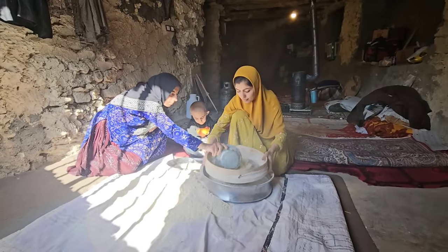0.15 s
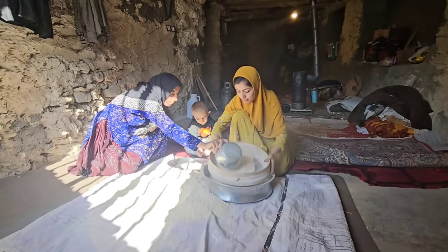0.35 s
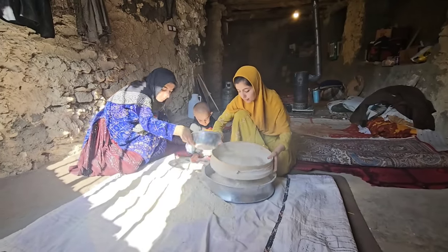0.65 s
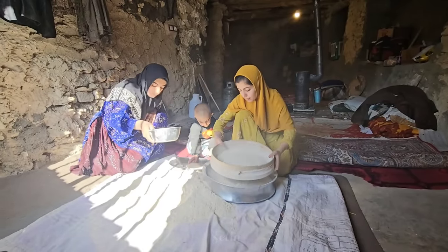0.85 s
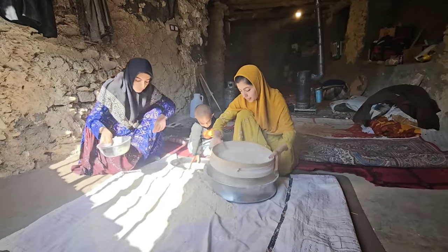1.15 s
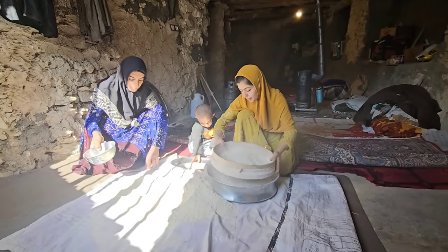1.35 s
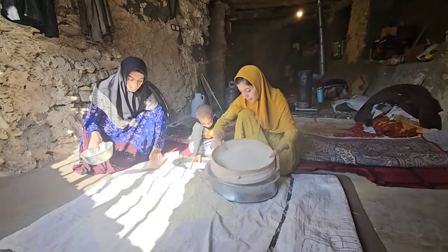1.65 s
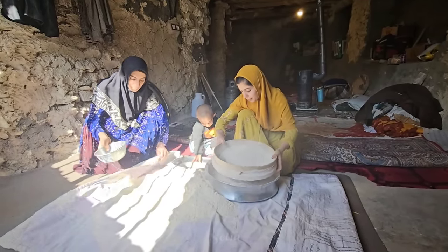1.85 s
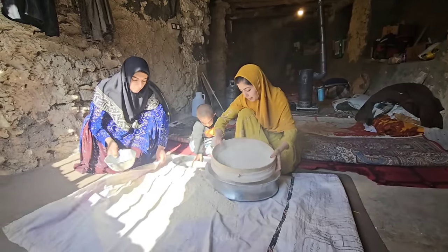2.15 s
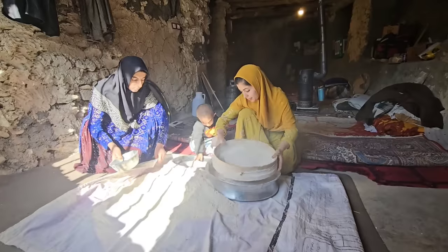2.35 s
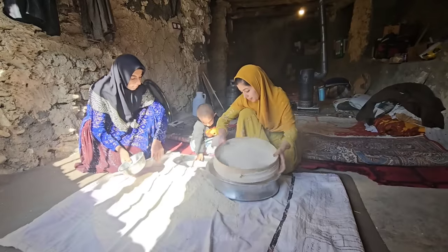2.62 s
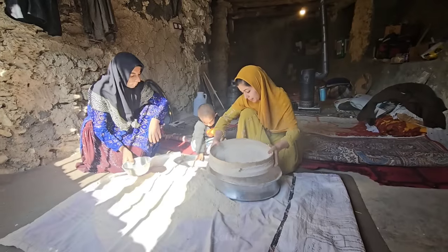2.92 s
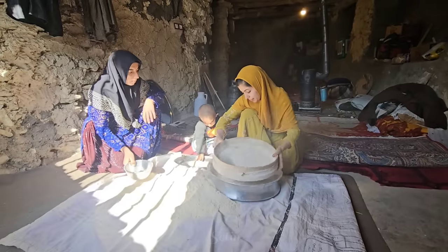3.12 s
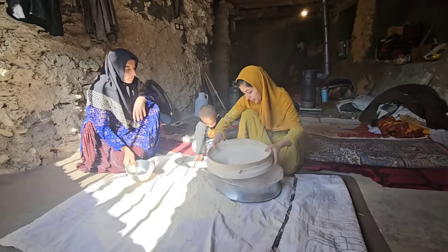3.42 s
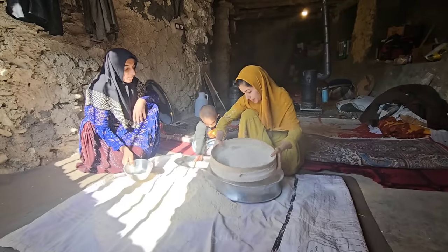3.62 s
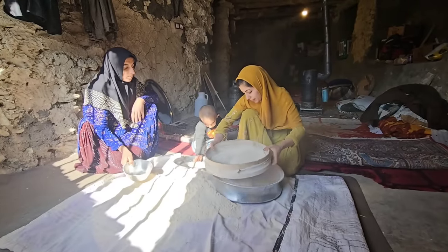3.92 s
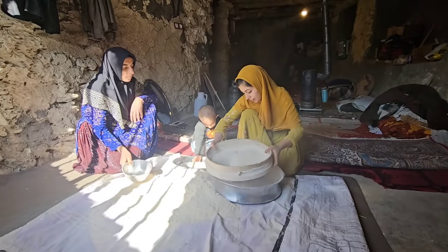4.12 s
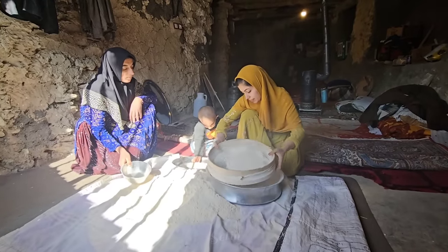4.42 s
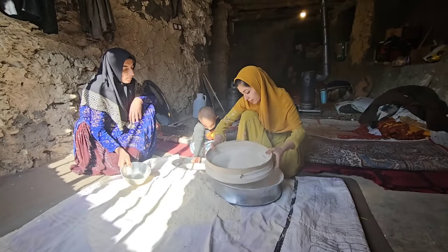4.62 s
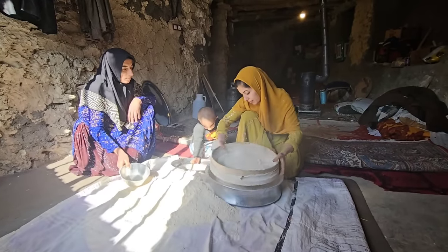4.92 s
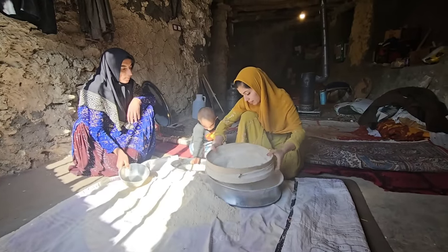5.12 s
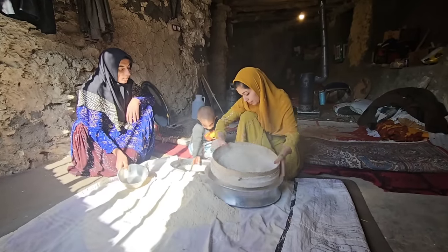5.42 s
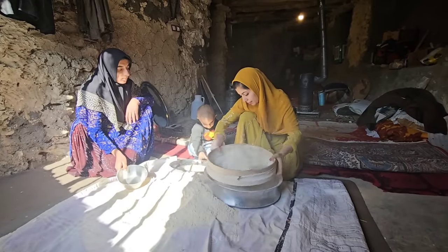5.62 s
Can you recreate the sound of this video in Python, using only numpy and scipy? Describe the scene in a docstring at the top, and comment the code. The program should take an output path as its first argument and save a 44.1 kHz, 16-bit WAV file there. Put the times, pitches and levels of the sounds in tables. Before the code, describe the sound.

Close, fairly dry stereo sound of hand sifting indoors: a brief metallic ring from a tipped bowl and a bright puff of flour, then fast back-and-forth scratchy swishes through mesh. Short hollow taps of the sieve frame on the basin rim start faint and sparse, growing into a busy clatter by the end. Beneath everything, a deep wavering rumble like a flame drawing in a pipe swells and sinks irregularly.

```python
"""From the start a low roar, like a flame drawing in a stove pipe, swells and sinks: noise in fixed resonances.
Early on a small metal bowl is tipped: scraping noise rings its modes, and fine flour sprays out brightly.
Flour is shaken through a round sieve, about eight turns a second: at each turn grainy noise slides and hisses
through the mesh over a steady trickle, and the basin below is rubbed into ringing.
Often the frame knocks on the basin rim: short noise bursts excite resonances of the sieve frame."""
import sys
import numpy as np
from scipy import signal
from scipy.fft import rfft, irfft, next_fast_len
from scipy.io import wavfile
from scipy.ndimage import uniform_filter1d

SR = 44100
rng = np.random.default_rng(int(sys.argv[2]) if len(sys.argv) > 2 else 0)


def digitize_waveform(pressure):
    """Quantize a signal to 16-bit integers and store it at the path in sys.argv[1].

    Rows of a 2-D input are taken as channels; values are limited to [-1, 1].
    """
    field = np.atleast_2d(pressure).T
    bounded = np.clip(field, -1, 1)
    quanta = np.round(bounded * 32767).astype(np.int16)
    wavfile.write(sys.argv[1], SR, quanta)


N = 254456

# lean of the stereo pair over frequency: frequency_hz, left_minus_right_db
BALANCE_DB = [(60, -0.5), (120, 2), (240, 0.5), (480, 0.5), (950, 5), (1890, -6.5), (3770, -1), (7520, 4.5),
              (15000, -1)]
LAG = 4   # samples by which shared sound reaches the left side later


def from_db(db):
    """Decibels are logarithmic: 20 dB is a factor of ten in amplitude."""
    return 10 ** (np.asarray(db) / 20)


def rms_one(x):
    """Normalisation: division by the root mean square gives unit power."""
    return x / np.sqrt(np.mean(x ** 2) + 1e-20)


def in_time(rows):
    """Linear interpolation makes each table column a curve over time; its end values hold outside."""
    s, *columns = np.transpose(rows)
    return [np.interp(np.arange(N) / SR, s, c) for c in columns]


def at_hz(points, hz):
    """Interpolation of a spectrum along a logarithmic frequency axis."""
    points_hz, points_db = np.array(points).T
    return np.interp(np.log(hz), np.log(points_hz), points_db)


def lean(balance_db):
    """A level difference between the sides is split evenly: half up on the left, half down on the right."""
    return balance_db / 2 * np.array([[1], [-1]])


def drift(corner_hz):
    """Slow random modulation of unit spread: white noise through two equal low-pass poles."""
    step = 40   # samples between the slow values
    pole = np.exp(-2 * np.pi * corner_hz * step / SR)
    white = rng.standard_normal(N // step + 2002)
    slow = signal.lfilter([1], [1, -2 * pole, pole * pole], white)[2000:]   # without the run-in
    return np.interp(np.arange(N) / step, np.arange(len(slow)), rms_one(slow))


def resonate(x, hz, width_hz):
    """A damped resonator: the wider its band, the faster it decays; gain 1 at the peak."""
    r = np.exp(-np.pi * width_hz / SR)
    feed = np.array([1, 0, -1]) * (1 - r * r) / 2
    return signal.lfilter(feed, [1, -2 * r * np.cos(2 * np.pi * hz / SR), r * r], x)


def pair(alike, lag=0):
    """Partial coherence: two white noises share a part of their power, which may lag on the left."""
    mid, left, right = rng.standard_normal((3, N))
    alike = np.clip(alike, 0, 1)
    shared = np.array([np.roll(mid, lag), mid])
    return np.sqrt(alike) * shared + np.sqrt(1 - alike) * np.array([left, right])


def coloured(x, spectrum):
    """Linear filtering multiplies the sound's spectrum by a gain curve and the stereo lean; rms 1."""
    size = next_fast_len(N)
    hz = np.maximum(np.arange(size // 2 + 1) * SR / size, 1)
    gain = from_db(at_hz(spectrum, hz) + lean(at_hz(BALANCE_DB, hz)))
    return rms_one(irfft(rfft(x, size) * gain, size)[:, :N])


def evened(x, share):
    """Partial compression: some of the chance swelling is taken out, so that the draught sets the swells."""
    power = uniform_filter1d(np.mean(x ** 2, axis=0), int(.06 * SR))
    return rms_one(x / (power + 1e-20) ** (np.clip(share, 0, 1) / 2))


def roar():
    """Turbulence excites each resonance; a group swells together, each member wavers a little alone."""
    # resonances of the roar: frequency_hz, width_hz, gain_db, left_right_likeness (0 to 1)
    roar_modes = [(30.3, 22, -12, 0.96), (61.5, 16.3, -2.5, 1), (85.45, 10.85, -0.5, 1),
                  (101.9, 7.55, -3, 0.97), (122.9, 14.6, -3, 0.93), (182, 11.3, -27.5, 0.58),
                  (208, 16, -24, 1), (243.7, 8.1, -14, 0.84), (271.9, 15.2, -25, 1), (361.3, 4.9, -27, 0),
                  (403.3, 14, -27.5, 0.58), (495, 17, -27, 1), (580.8, 23.6, -25.5, 0.55),
                  (618.2, 29.5, -26, 0.61), (643.6, 5.3, -24, 0.84), (739.4, 15.7, -39.5, 0.5),
                  (441, 26, -32.5, 0.4), (148.6, 22, -25.5, 0)]
    # draught in the pipe: time_s, rumble_level_db, upper_roar_level_db (before offsets and flutter)
    draught = [(0.0, -40.5, -49), (0.16, -41.5, -59), (0.42, -38, -50.5), (0.8, -40.5, -55),
               (0.93, -34.5, -48.5), (1.01, -37.5, -57), (1.1, -32.5, -42), (1.27, -40, -55),
               (1.66, -37.5, -48.5), (1.73, -30.5, -48.5), (1.95, -44, -56.5), (2.15, -33.5, -48.5),
               (2.34, -33.5, -51.5), (2.47, -43.5, -56), (2.56, -30, -47.5), (2.68, -38, -56),
               (2.83, -44.5, -61), (3.12, -33.5, -48.5), (3.23, -44.5, -56), (3.31, -35.5, -48.5),
               (3.5, -42.5, -57.5), (3.67, -45, -58), (3.87, -39, -54), (3.96, -43.5, -61),
               (4.17, -38.5, -52), (4.23, -49.5, -58.5), (4.29, -33.5, -47.5), (4.48, -43.5, -55.5),
               (4.6, -31, -50.5), (4.66, -43, -55), (4.71, -34.5, -49), (5.0, -44.5, -58.5),
               (5.14, -37, -50), (5.18, -45.5, -52.5), (5.31, -31, -47), (5.53, -42, -55.5),
               (5.61, -30.5, -43.5), (5.77, -40.5, -57.5)]
    # chance flutter of rumble, hum and breathy part: spread_db, corner_hz
    flutter = [(1.5, 9.6), (2.2, 9.3), (2.3, 18.6)]
    hum_db, breath_db = -2, -6.5   # offsets from the upper roar level
    groups = np.zeros((3, 2, N))   # rumble, hum, breathy part
    air = rng.standard_normal((3, 3, N + 8000))   # with run-in; neighbours get unrelated noise
    for k, (hz, width_hz, db, alike) in enumerate(roar_modes):
        alike = np.clip(alike, 0, 1)   # share of power common to both sides
        both = np.sqrt(alike) * air[k % 3, 0] + np.sqrt(1 - alike) * air[k % 3, 1:]
        each_hz = width_hz / np.sqrt(np.sqrt(2) - 1)   # two passes narrow it back, with steep flanks
        rung = resonate(resonate(both, hz, each_hz), hz, each_hz)[:, -N:]
        mode_db = db + lean(at_hz(BALANCE_DB, hz)) + 1.5 * drift(5.0)
        group = np.searchsorted([150, 320], hz)   # group borders in Hz
        groups[group] += rung * from_db(mode_db)
    rumble_db, upper_db = in_time(draught)
    levels = rumble_db, upper_db + hum_db, upper_db + breath_db
    return sum(from_db(db + flutter_db * drift(corner_hz)) * evened(group, share=0.45)
               for db, group, (flutter_db, corner_hz) in zip(levels, groups, flutter))


def bowl():
    """Forced vibration: a short rub with noise keeps the modes of the tipped bowl singing."""
    # small metal bowl: frequency_hz, width_hz, relative_level_db
    bowl_modes = [(1140, 9.1, -6), (1315, 24, 7), (1580, 33, 7), (1740, 63, -5), (2180, 70, 5),
                  (3080, 130, -1)]
    # its scrape: time_s, level_db
    tipping = [(.1, -100), (.13, -73), (.165, -62.5), (.2, -72), (.26, -87)]
    rub = pair(0.29)
    ringing = sum(from_db(db) * rms_one(resonate(rub, hz, width_hz)) for hz, width_hz, db in bowl_modes)
    return from_db(in_time(tipping)[0]) * rms_one(ringing)


def pour():
    """Many tiny impacts sum to noise: flour sprayed from the bowl is a thin, very bright swish."""
    top_s, spread_s = .168, 0.026   # the swell is a Gaussian bell
    swell = np.exp(-((np.arange(N) / SR - top_s) / spread_s) ** 2 / 2)
    high_pass = signal.butter(3, 8600, "high", fs=SR, output="sos")   # Hz
    fine = signal.sosfilt(high_pass, pair(0.15, lag=LAG))
    return from_db(-58) * swell * fine   # level before the high-pass


def rubbed_basin():
    """Friction drive: shifting contacts feed each basin mode with a strength that wanders within bounds."""
    # metal basin under the sieve: frequency_hz, width_hz, middle_level_db
    basin_modes = [(988.7, 10, 0), (1280, 18, -3.5), (1440, 110, 3.5), (1554, 21, 0), (1790, 150, 0.5),
                   (2067, 130, -2.5), (2455, 33, -3.5), (2964, 38, -2), (3530, 48, 0), (4110, 61, -1.5),
                   (4340, 30, -6)]
    rub = pair(0.11, lag=LAG)
    return rms_one(sum(from_db(db + 6.4 * np.tanh(drift(3.5))) * rms_one(resonate(rub, hz, width_hz))
                       for hz, width_hz, db in basin_modes))


def grains(per_s, spread_db):
    """Shot noise: random grains of uneven size, smoothed, modulate noise above a steady bed."""
    marks = rng.random(N) < per_s / SR
    sizes = from_db(spread_db * np.minimum(rng.exponential(1, N), 4))
    lumps = signal.lfilter([.05], [1, -.95], marks * sizes)
    return pair(0.22, lag=LAG) * (5.6 + rms_one(lumps))


def flour():
    """Incoherent sources add in power: each turn's slide swells and fades over the trickle."""
    # trickling between the turns: time_s, rasp_level_db, hiss_level_db (before mix and flicker)
    trickle = [(0.1, -70, -88), (0.19, -69, -77), (0.35, -77, -81), (0.52, -81, -93), (0.94, -66, -76),
               (1.3, -69, -82), (1.54, -64, -72), (2.17, -63.5, -64.5), (2.3, -68.5, -71),
               (2.81, -65, -73.5), (3.04, -63, -68.5), (3.79, -69, -75.5), (4.11, -62, -71),
               (4.5, -69, -71.5), (4.65, -57.5, -66.5), (4.77, -63.5, -81), (4.93, -63, -63.5),
               (5.06, -67.5, -76), (5.23, -59, -66), (5.34, -69, -77), (5.77, -61.5, -63.5)]
    # sliding over the mesh at each turn: top_s, rasp_level_db, hiss_level_db (likewise), length_scale_ms
    turns = [(0.046, -64.5, -74, 23), (0.236, -63, -64, 32), (0.427, -68, -79, 72), (0.612, -64.5, -77, 31),
             (0.722, -64, -73, 28), (0.861, -60, -64.5, 14), (0.973, -59, -65.5, 31),
             (1.11, -61.5, -66, 34), (1.209, -61.5, -67, 33), (1.355, -63.5, -63.5, 41),
             (1.46, -67, -57, 35), (1.504, -54.5, -53, 26), (1.6, -59.5, -60.5, 43), (1.7, -64, -62, 18),
             (1.836, -60, -60, 30), (1.955, -63, -63, 37), (2.087, -58, -63, 27), (2.22, -60, -69, 53),
             (2.318, -63.5, -66, 42), (2.464, -62, -66.5, 46), (2.567, -57.5, -61, 39),
             (2.684, -62, -65, 40), (2.813, -59.5, -63, 31), (2.937, -60, -65, 21), (3.062, -52, -59, 17),
             (3.165, -64, -66, 43), (3.296, -56.5, -60, 13), (3.433, -65, -65.5, 31),
             (3.52, -66, -67.5, 39), (3.657, -59, -62, 33), (3.769, -58.5, -65, 38),
             (3.899, -55.5, -57, 18.4), (3.996, -57.5, -64, 19), (4.117, -64, -59, 25),
             (4.217, -59, -65, 17), (4.347, -59.5, -59.5, 18), (4.454, -58, -61.5, 26),
             (4.576, -57.5, -60.5, 19), (4.611, -54.5, -79, 26), (4.691, -54.5, -60, 15),
             (4.802, -62, -61.5, 24), (4.867, -54.5, -85, 24), (4.917, -55.5, -67, 24),
             (5.035, -57, -61.5, 31), (5.165, -58.5, -65, 27), (5.275, -56, -58, 19), (5.408, -59, -63, 73),
             (5.523, -58.5, -57.5, 20), (5.634, -53.5, -61, 17), (5.76, -76, -62, 9.9)]
    # spectrum of the rasp: frequency_hz, density_db (per Hz)
    rasp_spectrum = [(800, -44), (1000, -10.5), (1270, -2), (1700, -0.5), (1950, 0), (2300, -4.5),
                     (3000, -6), (4500, -8), (5800, -14), (8000, -26)]
    # spectrum of the hiss: frequency_hz, density_db (per Hz)
    hiss_spectrum = [(2500, -10.5), (4400, -0.5), (5800, -2.5), (9000, -2), (11100, -5.5), (14600, -3),
                     (15800, -0.5)]
    t = np.arange(N) / SR
    rasp_power, hiss_power = from_db(in_time(trickle)) ** 2
    for s, rasp_db, hiss_db, length_ms in turns:
        near = slice(max(0, int((s - .2) * SR)), int((s + .2) * SR))
        late = (t[near] - s) * 1000 / max(length_ms, 5)   # in lengths from the top
        swell = np.exp(-np.where(late < 0, 1.16 * late, 1.05 * late) ** 2)   # rises faster than it falls
        rasp_power[near] += swell * from_db(rasp_db) ** 2
        hiss_power[near] += swell * from_db(hiss_db) ** 2
    rasp_level = np.sqrt(rasp_power) * from_db(2.1 * drift(33))
    rasp = rasp_level * (0.65 * coloured(grains(1500, 0.73), rasp_spectrum) + 0.33 * rubbed_basin())
    hiss_level = np.sqrt(hiss_power) * from_db(2.1 * drift(38))
    return rasp + hiss_level * coloured(grains(2900, 2.9), hiss_spectrum)


def knocks():
    """Impact excitation: the frame skids into the rim, strikes and rattles out, ringing its resonances."""
    # knocks: time_s (1.5 ms ahead of the strike), body_peak_db, ring_hz, upper_ring_db (re body peak)
    knock_table = [(0.298, -65.5, 1000, 9), (0.388, -62, 1000, -8), (0.608, -64, 1480, 5),
                   (0.7276, -56, 1440, -10), (0.856, -54, 1520, 0), (1.0972, -43, 1960, -2.5),
                   (1.1292, -49, 1540, -21), (1.2207, -46.5, 1460, -20), (1.3366, -56.5, 1680, 10.5),
                   (1.4895, -45, 1250, -13), (1.5262, -46, 1380, -13), (1.6147, -45, 1890, -15),
                   (1.7268, -45, 2350, -23), (2.0803, -51, 1260, -6), (2.1366, -52, 1030, -15),
                   (2.2195, -40, 1930, -22), (2.2355, -50, 1280, -18), (2.5717, -54, 1280, -5),
                   (2.827, -50, 1240, 4), (3.0597, -48, 1280, -3), (3.2962, -41.5, 1250, -5),
                   (3.4192, -51.5, 1380, -7), (3.5342, -42.5, 1700, -5), (3.6524, -45.5, 1880, -15),
                   (3.7687, -39.5, 1720, -4.5), (3.895, -41, 1820, -8), (3.9956, -39.5, 1800, -9),
                   (4.12, -46, 2030, -14), (4.2178, -35, 1950, -19), (4.339, -51, 1280, -1),
                   (4.4488, -43, 1250, -14), (4.574, -60, 1740, -3), (4.6055, -52, 1610, 1),
                   (4.6879, -41, 1970, -1), (4.81, -43, 1680, -13), (4.844, -47, 1550, -12),
                   (4.917, -47, 1860, -7), (5.0501, -39, 1520, -22), (5.1591, -36, 1410, -8.5),
                   (5.2787, -47, 1490, -23), (5.3907, -46.5, 1530, 4), (5.5228, -39, 1950, -9),
                   (5.6323, -40.5, 1850, 2), (5.754, -38.5, 1560, -11)]
    # sieve frame: frequency_hz, width_hz, gain_db
    frame_modes = [(1250, 73, -1.5), (1950, 120, -44), (3160, 330, -16), (3970, 820, -26.5)]
    contact_s = .0026   # decay time of the strike
    lead, size = 660, 4410   # samples
    out = np.zeros((2, N + size))
    t = (np.arange(size) - lead) / SR - .0015   # s from the strike
    rattle = from_db(-10.5) * np.exp(-np.abs(t) / 0.025)   # short bounces after the strike
    burst = np.where(t < 0, np.exp(t / (0.57 * contact_s)), np.exp(-t / contact_s) + rattle)
    strike = 8.4 * (np.arange(size) == np.searchsorted(t, 0))   # the hard moment of contact
    crack_filter = signal.butter(2, 6000, "high", fs=SR, output="sos")
    noise = rng.standard_normal((len(knock_table), 3, size))
    chance = rng.uniform(-1, 1, (len(knock_table), 3))
    for (s, db, low_hz, high_db), (mid, *own), (place, snap, side) in zip(knock_table, noise, chance):
        high_hz = 3300 + (4700 - 3300) * (place + 1) / 2   # anywhere in this range
        crack_db = -15.5 + 0.32 * high_db + 3 * snap   # gain; partly follows the upper ring
        pan_db = 3 + 2.5 * side   # left minus right
        hit = burst * (0.63 * mid + 1.1 * np.array(own)) + [np.roll(strike, LAG), strike]
        body = sum(from_db(gain_db) * resonate(hit, hz, width_hz) for hz, width_hz, gain_db in frame_modes)
        body = body + from_db(4.0) * resonate(hit, low_hz, 450)
        high = resonate(hit, high_hz, 920)
        knock = body / np.abs(body).max() + from_db(high_db) * high / np.abs(high).max()
        knock = knock + from_db(crack_db) * signal.sosfilt(crack_filter, hit)   # bright crack on top
        at = round(s * SR) - lead
        out[:, at:at + size] += knock * from_db(db + lean(pan_db))
    return out[:, :N]


def scene():
    """Superposition: the sound pressures of all sources add."""
    return roar() + flour() + knocks() + bowl() + pour()


def record(dry):
    """Band limiting: a steep elliptic low-pass removes the top of the spectrum."""
    low_pass = signal.ellip(12, .5, 60, 15790, fs=SR, output="sos")   # order, ripple dB, stop dB, edge Hz
    return signal.sosfilt(low_pass, dry)


dry = scene()
out = record(dry)
digitize_waveform(out)
```